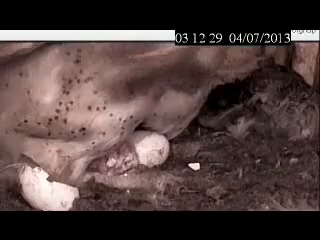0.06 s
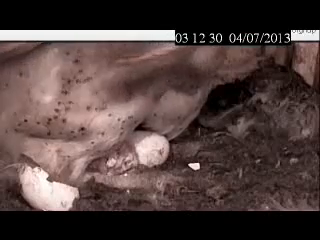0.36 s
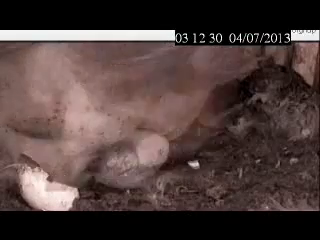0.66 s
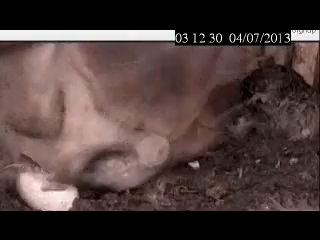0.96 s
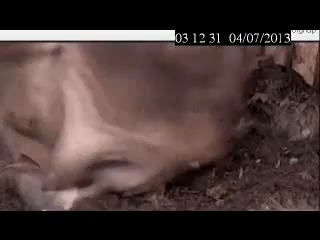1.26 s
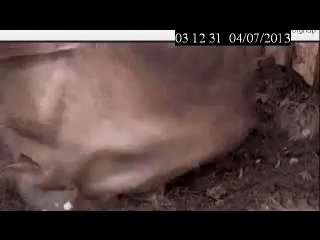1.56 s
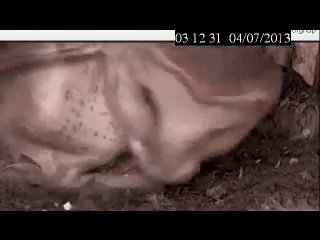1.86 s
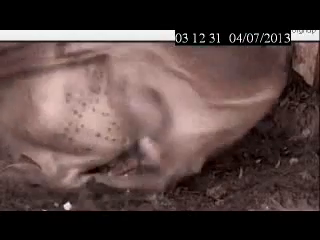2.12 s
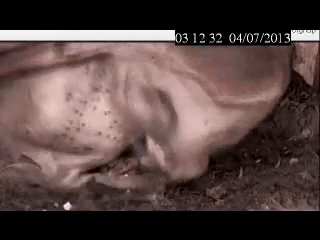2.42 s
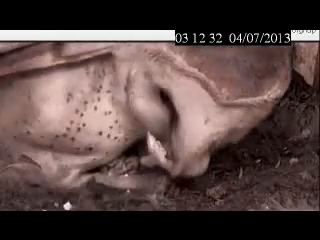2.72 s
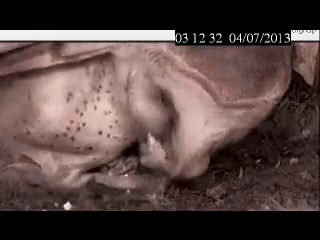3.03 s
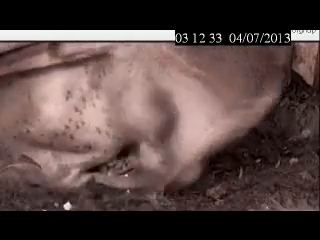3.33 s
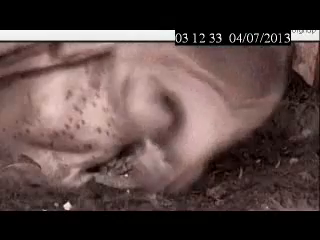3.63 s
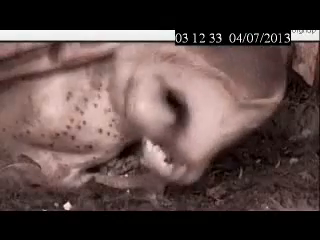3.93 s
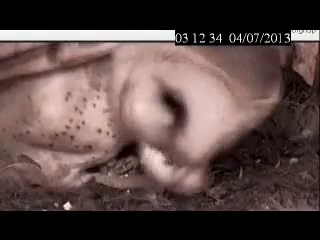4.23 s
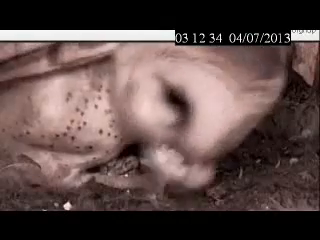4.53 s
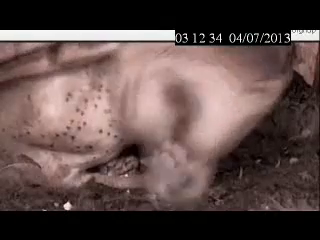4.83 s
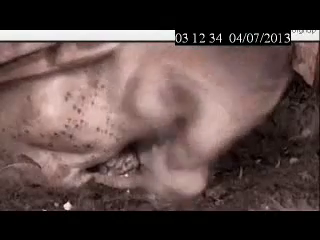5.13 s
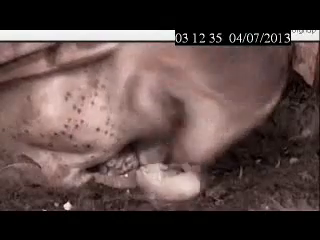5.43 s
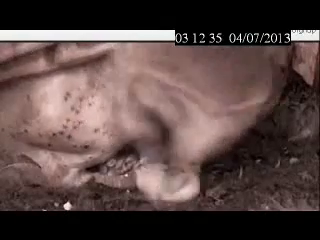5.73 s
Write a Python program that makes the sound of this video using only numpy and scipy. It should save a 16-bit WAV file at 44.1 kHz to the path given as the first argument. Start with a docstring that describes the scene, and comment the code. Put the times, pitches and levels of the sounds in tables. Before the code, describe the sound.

An owl bites an empty eggshell in close, brittle crunches inside a wooden nest box, over faint hiss and a low electronic flutter.

```python
"""Thin hiss, then within a second the close crunch of a barn owl biting an empty eggshell.
The microphone is a nest camera's, inside the wooden box with her and her newly hatched chick.
Each bite is a quick run of brittle cracks and gritty scrapes that flutter between the walls.
She shuffles softly on the litter. Behind her is the camera's own noise: the hiss,
a pulsing buzz, a low flutter and a thin whine."""
import sys
import numpy as np
from scipy.fft import rfft, irfft, next_fast_len
from scipy.io import wavfile
from scipy.ndimage import map_coordinates

SR = 44100
rng = np.random.default_rng(int(sys.argv[2]) if len(sys.argv) > 2 else 0)


def file_out(sig):
    """Save sig as 16-bit WAV at sys.argv[1]."""
    # one column per channel
    cols = np.atleast_2d(sig).T
    # limit, then scale
    lim = np.clip(cols, -1, 1)
    pcm = np.round(lim * 32767).astype(np.int16)
    wavfile.write(sys.argv[1], SR, pcm)


N = 263277

# Strokes of the beak on the shell; knock, body and bright tint the lows, mids and treble:
# middle_s, half_length_s, scrape_db, knock_db, body_db, bright_db, piece_hz, floor_hz
BITES = [(0.723, .015, -52.5, -12, 6, -3, 2900, 800), (0.804, 0.004, -24.5, -12, -10, -16.5, 2940, 890),
         (0.819, .008, -17.5, -20.5, -6, -14, 4400, 910), (0.949, .01, -42.5, -30, -15, -14, 2870, 800),
         (1.014, .022, -34, -17.5, 1, -20.5, 2850, 950), (1.065, .013, -31.5, -31.5, -11.5, -15, 3030, 600),
         (1.352, 0.017, -22.5, -17.5, 6, -14.5, 2820, 970), (1.386, 0.021, -33, -4, 9, -10, 2830, 870),
         (1.5, 0.016, -39, -16, 2, -16, 2820, 900), (1.885, .012, -40, -14.5, -7, -1.5, 2750, 680),
         (1.933, 0.0074, -18.5, -20, -1, -8, 2450, 935), (2.381, .019, -30.5, -16.5, 0.5, -8.5, 2600, 665),
         (3.029, .017, -27.5, -15, 4.5, -6, 2825, 676), (3.233, 0.024, -44.5, -12, -5, -14.5, 2960, 446),
         (3.271, 0.014, -27, -3, 7.5, -6, 2730, 690), (3.329, 0.0081, -30.5, -20, 5.5, -11.5, 4930, 690),
         (3.635, 0.018, -49.5, -31, -1, -2, 2850, 805), (3.696, .022, -26.5, -11.5, 0, -7, 2830, 720),
         (4.184, .007, -36.5, -16, -2.5, -3, 3540, 750), (4.207, 0.0099, -35.5, -14, 6.5, -8, 5250, 955),
         (4.423, 0.014, -20, -15, -1.5, -0.5, 2800, 636), (4.468, .016, -27, -23, 3.5, -8.5, 4810, 650),
         (4.794, .035, -53, -6.5, -2.5, -11.5, 2840, 800), (4.859, 0.012, -25, -35, -8.5, -6.5, 3730, 692),
         (4.89, .008, -22, -11, 2.5, -11, 2660, 675), (4.937, 0.0089, -28, -21, 5.5, -20, 2700, 840),
         (4.969, 0.0045, -38, -27, -7, -9.5, 4900, 670), (5.246, 0.011, -34.5, -21, 3.5, -2.5, 2900, 390),
         (5.321, .006, -52, -41, -6, -11, 4800, 800), (5.384, 0.00575, -43.5, -9, 10, -37, 2635, 930),
         (5.759, 0.019, -39, -22, -12.5, -14.5, 2890, 560), (5.882, .016, -36.5, -15.5, -8, -5, 2760, 780),
         (5.96, 0.0085, -38.5, -31, -8, -2.5, 2860, 505)]
# Sharp cracks, each coloured by the nearest bite: time_s, level_db, knock_db
CRACKS = [(0.8047, -19.5, -12), (0.8212, -21.5, -22.5), (1.0494, -28, -42), (1.3288, -30.5, -13),
          (1.3341, -16, -16), (1.4942, -29.5, -24), (1.8883, -31, -31), (1.9243, -16, -16.5),
          (1.9291, -11, -23), (2.371, -36, -42), (3.0124, -34.5, -26), (3.043, -28.5, -12),
          (3.2421, -20, -14), (3.2616, -30, -7), (3.3266, -20, -21), (3.6673, -36.5, -43),
          (3.6771, -29.5, -32), (3.6877, -24, -21), (4.1796, -32.5, -14), (4.203, -28.5, -19),
          (4.4111, -27, -6.5), (4.427, -18.5, -13), (4.4316, -19.5, -9), (4.4494, -29, -52),
          (4.4605, -26.5, -28), (4.4713, -24.5, -21), (4.8728, -9, -22), (4.8865, -21, -14.5),
          (4.9299, -23.5, -23), (4.9635, -31, -27), (5.2372, -39.5, -20.5), (5.3167, -50, -38),
          (5.3744, -36, -14), (5.7394, -31, -59)]
# Colour of the crunch through the camera: breaking shell up to 7 kHz, plus a thin sizzle near 14 kHz that rides
# with it: frequency_hz, gain_db
CRUNCH_COLOUR = [(100, -21.5), (220, -8), (400, -3), (850, 0.5), (1300, -5.5), (2000, -5), (2700, 3.5),
                 (3900, 0), (5000, 2.5), (5600, -5), (6750, -7.5), (7200, -29.5), (12500, -47.5),
                 (14300, -18), (15500, -35)]
# Resonances of the nest box: pitch_hz, width_hz, gain_db
BOX_RESONANCES = [(372, 60, 7), (740, 130, 4), (918, 70, 8), (1770, 60, 3), (2280, 70, 4), (2612, 80, 3),
                  (2790, 150, 3), (3320, 70, 3), (4060, 70, 3), (5102, 60, 4), (6315, 60, 4), (6560, 60, 3)]
# Balance of the crunch at the microphone: frequency_hz, left_over_right_db
CRUNCH_BALANCE = [(100, 10.5), (380, 3.5), (680, 1.5), (950, 0.5), (1300, -0.5), (2900, -2.5), (3350, 4),
                  (3600, 0), (3900, -1.5), (4650, -3), (5200, -0.5), (5500, -1), (12000, -1.1)]
# The owl shifts her weight: middle_s, level_db
WEIGHT_SHIFTS = [(0.3, -70.5), (0.76, -72), (1.81, -65), (2.57, -67.5), (5.0, -65), (5.32, -63.5),
                 (5.6, -67), (5.87, -65.5)]
# Soft footfalls: start_s, level_db, pitch_hz
FOOTFALLS = [(0.807, -48.5, 181), (1.933, -50.5, 235.4), (3.351, -51.5, 122), (4.879, -42.5, 257),
             (5.275, -49, 219), (5.318, -55.5, 190)]
# Colour of pressed litter: frequency_hz, gain_db
LITTER_COLOUR = [(50, -25), (110, -3), (200, 3.5), (260, -8), (380, -15.5), (1000, -33.5), (3000, -60)]
# Colour of the camera's hiss: frequency_hz, gain_db
HISS_COLOUR = [(20, -6), (45, -4), (75, -6), (220, -5), (400, -15), (650, -17), (1900, -21), (3500, -22.5),
               (9000, -26), (14000, -27.5), (15000, -28), (15500, -42)]
# How alike the hiss is left and right: frequency_hz, correlation
HISS_LIKENESS = [(60, 0.12), (180, 0.44), (550, 0.65), (1650, 0.62), (4970, 0.26), (15000, 0.35)]
# Colour of the camera's buzz: frequency_hz, gain_db
BUZZ_COLOUR = [(2000, -50), (4500, -12), (5500, -10.5), (5900, 10), (6200, -12), (6570, 3), (6900, -10.5),
               (7300, -37.5), (14000, -32), (14800, -15), (15300, -42)]
# Fits of flutter in the camera's supply: start_s, end_s, channel (0 left, 1 right)
FLUTTER_FITS = [(0, .37, 1), (.55, 1.0, 0), (1.42, 1.92, 1), (1.97, 2.13, 0), (2.42, 2.76, 0),
                (2.76, 3.01, 1), (3.76, 4.76, 0), (4.22, 4.85, 1), (5.28, 5.54, 0), (5.71, 5.97, 1)]
# Centre of the whine: time_s, pitch_hz
WHINE_PITCH = [(0, 11900), (.42, 11500), (.75, 12600), (1.15, 11460), (1.65, 12600), (2.17, 11550),
               (2.8, 12420), (3.55, 11970), (5.15, 12010), (5.97, 12600)]


def eggshell(level_window_s=0.0015, size=6144, lead_samples=2048):
    """Close to the microphone, every bite scrapes the shell and may crack it; the box answers."""
    out = np.zeros((2, N + 2 * size))
    t, hz = np.arange(size) / SR, np.fft.rfftfreq(size, 1 / SR)
    since = t - t[lead_samples]
    box, crunch_db = nest_box(hz), along(CRUNCH_COLOUR, hz)
    # As a bite goes on it presses the shell onto the floor: more knock, less treble.
    knock_db_per_s, dulling_db_per_s = 263, 110

    def add(time_s, level_db, knock_db, bite, force):
        """Shell on the floor knocks low, a splinter is bright; piece and floor each ring."""
        middle_s, _, _, _, body_db, bright_db, piece_hz, floor_hz = bite
        bright_db -= dulling_db_per_s * (time_s - middle_s)
        tint = [(950, knock_db + 12.5), (1300, body_db), (2000, body_db),
                (2600, 0), (3200, 0), (4200, bright_db + 10.5)]
        ring_db = 8 * bell(hz - piece_hz, 0.088 * piece_hz) + 7 * bell(hz - floor_hz, 150)
        colour = causal(crunch_db + along(tint, hz) + ring_db)
        sound = unit_energy(irfft(rfft(force) * colour * box * reflections(t)))
        out[:, round(time_s * SR):][:, :size] += amp(level_db) * np.sqrt(SR * level_window_s) * sound

    for bite in BITES:
        middle_s, half_s, scrape_db, knock_db = bite[:4]
        for late_s in (-half_s / 2, half_s / 2):  # the beak grips, then presses
            scrape = scraping(since, 0.65 * half_s)
            add(middle_s + late_s, scrape_db - 2.5, knock_db + knock_db_per_s * late_s, bite, scrape)
    for time_s, level_db, knock_db in CRACKS:
        bite = min(BITES, key=lambda row: abs(row[0] - time_s))
        add(time_s, level_db, knock_db, bite, fracture(since))
    crunch = out[:, lead_samples:][:, :N]
    return filtered(crunch, lambda f: amp(np.outer([.5, -.5], along(CRUNCH_BALANCE, f))))


def fracture(t, crumbs_db=2, snap_s=0.00093, lead_s=0.0026, crumble_s=.0045):
    """The shell tears in a short snap at t = 0; tiny cracks build up before it and die away after."""
    snap = grit(bell(t - snap_s, snap_s), spiky=0.44)
    strain = np.exp(np.where(t < 0, t / lead_s, -t / crumble_s))
    return snap + amp(crumbs_db) * grit(strain, spiky=0.73)


def scraping(t, half_s, clump_db=5.5, clump_s=.002):
    """The beak slips over the shell in catches, each a little clump of tiny fractures."""
    knots = rng.standard_normal(int((t[-1] - t[0]) / clump_s) + 2)
    catches_db = clump_db * np.interp((t - t[0]) / clump_s, np.arange(len(knots)), knots)
    return grit(amp(catches_db) * bell(t, half_s), spiky=0.96)


def grit(strain, spiky):
    """A cloud of tiny fractures of very unequal size, energy 1."""
    grains = strain * rng.standard_normal(len(strain))
    sizes = np.exp(spiky * rng.standard_normal(len(strain)))
    return unit_energy(grains * sizes)


def nest_box(hz, reflection=0.28, round_trip_s=.00568):
    """The box rings at its resonances, and sound bounces to and fro between two facing walls."""
    ring = 1 + sum((amp(db) - 1) * 1j * hz * width / (pitch ** 2 - hz ** 2 + 1j * hz * width)
                   for pitch, width, db in BOX_RESONANCES)
    return ring / (1 - reflection * np.exp(-2j * np.pi * hz * round_trip_s))


def reflections(t, mid_db=-8, side_db=-16, t60_s=.052):
    """Direct sound and a short stereo wash off the walls, new for each place of the beak."""
    envelope = amp(-60 * t / t60_s) * (1 - np.exp(-t / 0.0047))
    mid, side = rng.standard_normal((2, len(t))) * envelope
    wash = amp(mid_db) * unit_energy(mid) + amp(side_db) * np.outer([1, -1], unit_energy(side))
    return rfft((t == 0) + wash)


def shuffling(resting_db=-77.5, push_half_s=0.043, tug_db=-41.5, tug_lag_s=.006, step_t60_s=.14):
    """Feet and belly press the litter in soft, uneven bumps as she bites, shifts and steps."""
    tugs = [(time_s + tug_lag_s, db + tug_db) for time_s, _, db, *_ in BITES]  # bites tug at her body
    coarse_s = np.arange(0, N, 64) / SR
    power = amp(resting_db) ** 2 + sum((amp(db) * bell(coarse_s - time_s, push_half_s)) ** 2
                                       for time_s, db in WEIGHT_SHIFTS + tugs)
    pressure = np.interp(np.arange(N) / SR, coarse_s, np.sqrt(power))
    out = pressure * amp(4.9 * wobble(27)) * noise(LITTER_COLOUR)
    t = np.arange(SR // 5) / SR
    for start_s, level_db, pitch_hz in FOOTFALLS:
        envelope = amp(level_db - 60 * t / step_t60_s) * (1 - np.exp(-t / 0.0013))
        out[round(start_s * SR):][:len(t)] += envelope * np.sin(2 * np.pi * pitch_hz * t)
    return out


def camera_hiss(treble_db):
    """The camera's steady noise floor, partly shared by the two channels."""
    def spread(hz):
        return np.arccos(np.clip(along(HISS_LIKENESS, hz), -1, 1)) / 2

    mid = filtered(noise(HISS_COLOUR), lambda hz: np.cos(spread(hz)))
    side = filtered(noise(HISS_COLOUR), lambda hz: np.sin(spread(hz)))
    treble_rms = np.std(filtered(mid, lambda hz: hz > 400))
    return amp(treble_db) * np.array([mid + side, mid - side]) / treble_rms


def camera_buzz(first_s, length_s, buzz_db, thud_db, tone_db, period_s=.2003, tone_hz=5875):
    """The electronics buzz and thud in short bursts, five a second, over a faint steady tone."""
    t = np.arange(N) / SR
    offset_s = (t - first_s + period_s / 2) % period_s - period_s / 2
    bursts = np.exp(-(2 * offset_s / length_s) ** 4)
    thud_gain = amp(thud_db + 3.4 * wobble(7.3))
    thud = thud_gain * noise([(20, -6.0), (60, 2.5), (110, -7.0), (300, -54.5), (1000, -91.5)])
    buzz = amp(buzz_db + wobble(4)) * noise(BUZZ_COLOUR)
    return bursts * (buzz + thud) + amp(tone_db) * np.sin(2 * np.pi * tone_hz * t)


def camera_supply(flutter_db, rumble_db, whine_db, flutter_hz=14, swing_hz=1300):
    """The supply flutters in fits: a low throb to one side, a rumble, and a whine swept by the throb."""
    t = np.arange(N) / SR
    calm_depth, edge_s = 0.12, 0.025
    depth = np.full((2, N), calm_depth)
    for start_s, end_s, channel in FLUTTER_FITS:
        fit = np.clip(np.minimum(t - start_s, end_s - t) / edge_s + .5, 0, 1)
        depth[int(channel)] += (1 - calm_depth) * fit
    deepest = depth.max(axis=0)
    flutter = depth * sine(flutter_hz * np.exp(.45 * np.array([wobble(30), wobble(30)])))
    rumble_colour = [(10, 0), (22, -4.0), (45, -16.0), (90, -24.5), (400, -70.0)]
    rumble = deepest ** 0.76 * np.array([noise(rumble_colour), noise(rumble_colour)])
    sweep = (depth * flutter).sum(axis=0) / np.maximum(1, np.linalg.norm(depth, axis=0))
    jitter_hz = (60 + 330 * deepest) * wobble(70) + 90 * wobble(500)
    whine = sine(np.interp(t, *np.transpose(WHINE_PITCH)) + swing_hz * sweep + jitter_hz)
    rumble_gain = amp(rumble_db + 4.7 * wobble(9.7))
    return amp(whine_db) * whine + amp(flutter_db) * flutter + rumble_gain * rumble


def amp(db):
    """Decibels to gain."""
    return 10 ** (np.asarray(db) / 20)


def bell(x, half_width):
    """A smooth hump, 1 at x = 0 and 1/e at half_width."""
    return np.exp(-(x / half_width) ** 2)


def sine(hz):
    """A tone that follows a moving pitch."""
    return np.sin(2 * np.pi * np.cumsum(hz, axis=-1) / SR)


def unit_energy(x):
    """x at energy 1."""
    return x / np.sqrt(np.sum(x ** 2) + 1e-20)


def along(points, hz):
    """(frequency_hz, value) points read on a log axis."""
    point_hz, values = np.transpose(points)
    return np.interp(np.log(hz + 1), np.log(point_hz + 1), values)


def wobble(rate):
    """A smooth random curve, rate knots a second."""
    coarse = np.arange(0, N + 32, 32)
    knots = rng.standard_normal(int(N * rate / SR) + 4)
    return np.interp(np.arange(N), coarse, map_coordinates(knots, [coarse * rate / SR]))


def filtered(x, response):
    """x through a response of frequency."""
    size = next_fast_len(N + SR // 2)
    return irfft(rfft(x, size) * response(np.fft.rfftfreq(size, 1 / SR)), size)[..., :N]


def noise(colour):
    """Noise of rms 1, coloured by (frequency_hz, gain_db) points."""
    size = next_fast_len(N)
    gain = amp(along(colour, np.fft.rfftfreq(size, 1 / SR)))
    x = irfft(rfft(rng.standard_normal(size)) * gain, size)[:N]
    return x / np.sqrt(np.mean(x ** 2) + 1e-20)


def causal(db):
    """Minimum-phase response with the given gain at each frequency."""
    cepstrum = irfft(np.log(amp(db)))
    half = len(cepstrum) // 2
    cepstrum[1:half] *= 2
    cepstrum[half + 1:] = 0
    return np.exp(rfft(cepstrum))


def scene():
    """Inside the nest box: the owl close to the microphone, over the camera's own noise."""
    buzz = camera_buzz(first_s=.142, length_s=0.056, buzz_db=-69.5, thud_db=-70.5, tone_db=-83)
    supply = camera_supply(flutter_db=-48.5, rumble_db=-58, whine_db=-77)
    return eggshell() + shuffling() + camera_hiss(treble_db=-74) + buzz + supply


def record(dry):
    """The camera keeps nothing above its band limit."""
    return filtered(dry, lambda hz: hz < 15600)


dry = scene()
out = record(dry)
file_out(out)
```